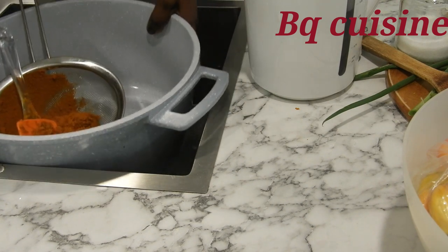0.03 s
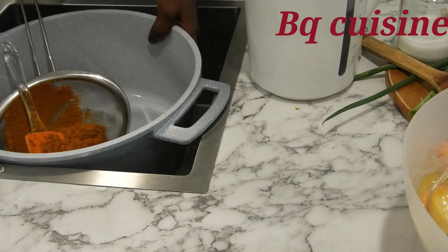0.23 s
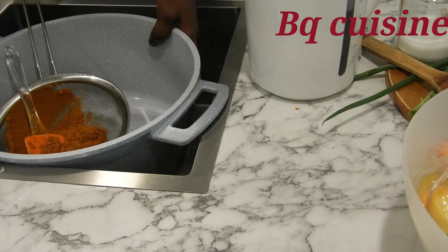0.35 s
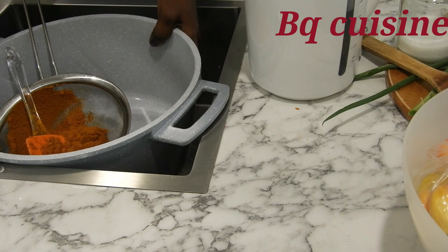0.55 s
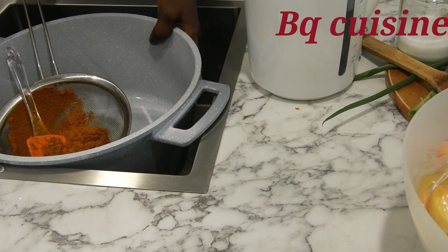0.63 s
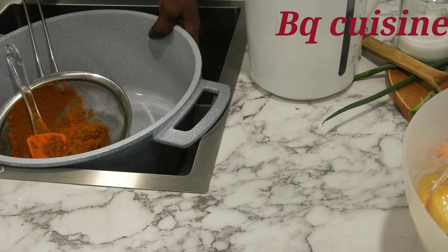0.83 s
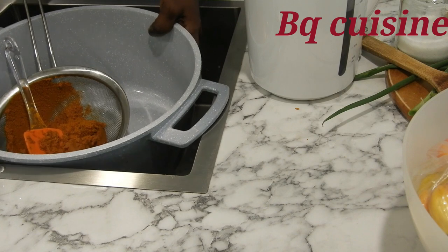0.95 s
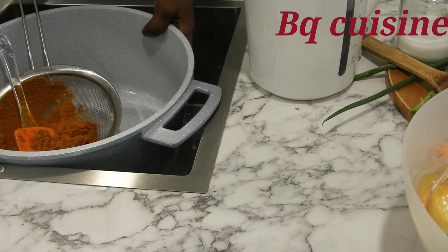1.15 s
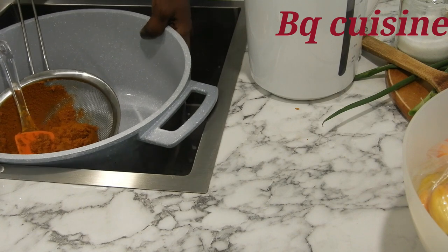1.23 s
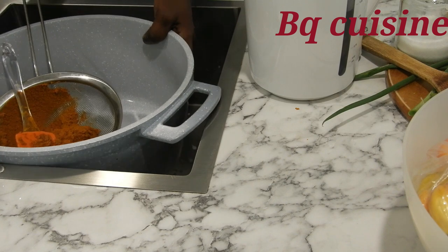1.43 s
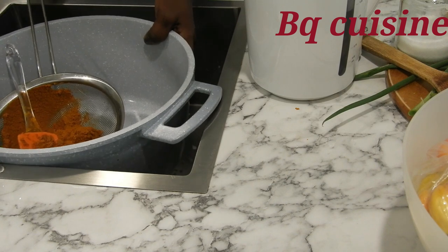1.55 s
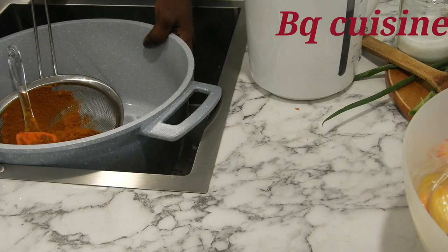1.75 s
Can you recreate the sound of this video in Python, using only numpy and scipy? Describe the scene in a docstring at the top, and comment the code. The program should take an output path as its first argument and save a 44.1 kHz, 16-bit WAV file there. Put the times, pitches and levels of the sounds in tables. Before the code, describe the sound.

A spatula knocks and drags thick paste through a metal sieve in a cast pot: two strong clattering knocks early, a quiet gap, then softer taps, groaning scrapes and wire clinks; close stereo, small hard-walled kitchen.

```python
"""Spatula and sieve in a cast pot

A spatula works thick paste through a metal sieve lying in a cast pot, close by in a small kitchen.
Knocks: decaying modes of hob, pot and sieve plus filtered noise cracks. Wire handle: bright clinks.
The spatula drags throughout: low noise judder, groans of unsteady pitch, grainy wet hiss.
Dull bumps are damped low sines; knocks, clinks and bumps excite a diffuse noise reverberation."""
import sys
import numpy as np
from scipy import signal
from scipy.fft import rfft, irfft
from scipy.io import wavfile

SR = 44100
rng = np.random.default_rng(int(sys.argv[2]) if len(sys.argv) > 2 else 0)


def int16_out(signal):
    """Quantize to a 16-bit WAV file."""
    q = np.round(np.clip(np.atleast_2d(signal).T, -1, 1) * 32767)
    wavfile.write(sys.argv[1], SR, q.astype(np.int16))


N = 79380
T = np.arange(N) / SR
FREQS_HZ = np.arange(N + 1) * SR / (2 * N)

# steady room noise spectrum: f/Hz, level per Hz/dB
FLOOR_SPECTRUM = [(25, -15), (65, -3.5), (130, -4.5), (250, -19), (500, -15.5), (1200, -20.5), (2000, -30),
                  (4000, -32), (8000, -33.5), (16000, -18)]
FLOOR_DB = -52.5

# force of the spatula's stroke: t/s, judder level/dB, mesh hiss level/dB
STROKE = [(0, -54.5, -59), (0.111, -66, -56), (0.166, -36.5, -67), (.27, -32.5, -45), (.45, -36, -71),
          (.62, -48, -63), (.78, -74.5, -61), (.94, -61.5, -58), (1.052, -61, -58.5), (1.16, -47, -54.5),
          (1.279, -40, -53.5), (1.35, -41.5, -52.5), (1.43, -43.5, -57), (1.5, -41, -53),
          (1.55, -51.5, -53.5), (1.654, -50, -50.5), (1.72, -50, -51.5), (1.8, -49.5, -53.5)]
# pot shaken by the stroke, spectrum: f/Hz, level per Hz/dB
JUDDER_SPECTRUM = [(30, -33), (70, -5.5), (110, -4.5), (160, -1.5), (215, 1.5), (340, -7.5), (500, -9),
                   (650, -18.5), (900, -17), (1170, -17), (1600, -26), (2300, -22), (5000, -34)]
JUDDER_ROUGH_DB, JUDDER_RATE_HZ = 1, 57
# paste through the mesh, spectrum: f/Hz, level per Hz/dB
MESH_SPECTRUM = [(500, -26), (1300, 6.5), (2500, -5.5), (4000, -2), (5500, 0.5), (9000, 10.5), (15000, -3)]
GRAINS_PER_S, GRAIN_T60_S, GRAIN_SPREAD_DB, GRAIN_SHARE = 450, 0.031, 2, 0.78

# pot and sieve knocks: t/s, thump level/dB, thud f/Hz, thud t60/s, thud level/dB, pot level/dB,
# clack level/dB, rim f/Hz, rim level/dB, edge level/dB, tick level/dB, crack t60/s,
# rattle level re crack/dB, sieve ring level/dB, wall ring level/dB, low clang f/Hz, low clang level/dB,
# high clang f/Hz, high clang level/dB, left over right before the scene's pan/dB
KNOCKS = [ (.1550, -24, 284.8, 0.098, -16.5, -22.5, -25.5, 1830, -33, -31.5, -20.5, 0.03, 25, -34.5, -29, 652, -27.5, 1036, -32, 0.5),
          (.3210, -44, 348, 0.012, -15, -17.5, -24.5, 1378, -24.5, -29, -25, 0.023, -28, -22.5, -33, 777, -30, 2800, -28, 1),
          (0.4758, -51, 345, 0.013, -34, -36, -32.5, 2070, -38.5, -43, -35.5, 0.11, -20, -46, -45, 650, -38.5, 1163, -38.5, 0),
          (0.489, -41, 348.5, 0.029, -30, -37, -48, 1910, -50.5, -39.5, -68, 0.039, -17, -50, -47, 631, -45, 1140, -39, 2),
          (.9650, -46.5, 341, 0.023, -33, -36.5, -55, 1540, -54, -63, -80, 0.087, 13, -51.5, -58.5, 1415, -53, 2323, -57, 2),
          (1.1920, -33.5, 340, 0.025, -30, -31, -31, 2080, -41.5, -40.5, -41, 0.098, -8, -39.5, -43, 660, -35.5, 910, -37.5, 0.7),
          (1.2150, -45, 229, 0.14, -30, -32, -63, 1960, -64, -47, -42, 0.19, 1, -48.5, -56, 900, -42, 1660, -48, 0),
          (1.3947, -44.5, 347, 0.035, -44.5, -43, -40.5, 1710, -48, -52, -46, 0.15, -8, -60, -50, 1217, -44, 2000, -51.5, 1),
          ]
# resonances of hob, pot, pot wall and sieve: f/Hz, level/dB, t60/s
HOB_MODES = [(44, -2.5, 0.26), (109.9, 14, 0.18), (157.6, 7, 0.18)]
POT_MODES = [(225.4, 3, 0.17), (269, -7.5, 0.35), (326.1, -7.5, 0.21), (355, -11, 0.2), (429, -11, 0.13),
             (545.5, -4.5, 0.11), (668, -22.5, 0.25)]
WALL_MODES = [(1667, 1, 0.11), (1873, -0.5, 0.14), (2005, 0, 0.16), (2150, -3.5, 0.13), (2367, -2, 0.17),
              (2450, -7, 0.167), (2794, -6, 0.21), (3054, -5.5, 0.24), (3452, 0.5, 0.11), (3898, -2.5, .14)]
SIEVE_MODES = [(842, -22.5, 0.26), (1095, -8, 0.16), (1162, -1.5, 0.29), (1202, 8.5, 0.18),
               (1266, -7, 0.11), (1423, 3, 0.1)]
# contact noise spectra, dull to bright: f/Hz, level per Hz/dB
CLACK_SPECTRUM = [(250, -12), (480, -9), (600, 6.5), (780, -6), (890, 5), (970, -2.5), (1170, 8),
                  (1400, -11), (1580, -12.5), (1900, -15.5), (3000, -59.5)]
EDGE_SPECTRUM = [(1800, -26), (2400, 2.5), (2790, -5.5), (3050, -2.5), (3550, -3.5), (4100, -3.5),
                 (5200, -24)]
TICK_SPECTRUM = [(3000, -7.5), (4300, 3.5), (5200, 0.5), (6500, 2.5), (7800, 1.5), (9000, 7.5),
                 (11000, -5.5), (16000, -12)]
CLACK_WIDTH, EDGE_WIDTH, TICK_WIDTH = 0.19, 0.58, 0.46  # side over mid
THUMP_RISE_S, POT_RISE_S, RING_RISE_S, THUD_RISE_S = 0.01, 0.0055, 0.0044, 0.0033
CONTACT_RISE_S, RATTLE_T60_S = 0.0012, 0.18
TICK_CRACK_T60_S, TICK_RATTLE_DB = 0.093, -17
CLANG_T60_S, CLANG_RISE_S = 0.047, 0.0008  # t60 up to 1 kHz
RING_WOBBLE, RING_WOBBLE_HZ = 0.0033, 69.4  # relative random pitch spread of all rings; its rate
SIEVE_LAG_S = 0.011  # the loose sieve lands just after the pot
RIM_STEP = 0.094  # relative frequency step between points of the rim peak

# wire handle on the rim: t/s, tap level/dB, tick level/dB, wire ring level/dB
CLINKS = [ (0.2078, -42, -31, -39), (1.4447, -35, -34, -40.5), (1.6660, -40.5, -45, -44.5), ]
# wire handle resonances: f/Hz, level/dB, t60/s
WIRE_MODES = [(663.4, 1.5, 0.18), (1110, 4, 0.12), (2600, -4.5, 0.2), (3096, -0.5, 0.14),
              (3445, -3.5, 0.14), (3750, 5, .09), (3810, 3, 0.044), (6500, 7.5, 0.082)]
# wire tap spectrum: f/Hz, level per Hz/dB
WIRE_SPECTRUM = [(250, -12), (620, 3), (800, 2), (1130, -6), (1400, -9), (2250, -19.5), (2600, 5),
                 (3000, -16), (3400, 1.5), (3750, -8), (4150, 2), (5200, -7)]
WIRE_CRACK_T60_S, WIRE_RATTLE_DB = 0.11, 6

# groans of stick and slip: t/s, length/s, f/Hz, level/dB
GROANS = [(.225, 0.1, 230, -36.5), (.615, .07, 351.1, -44), (.67, 0.062, 206, -52.5),
          (1.25, .075, 223.6, -43), (1.318, 0.086, 203.6, -35.5), (1.465, 0.07, 209, -39),
          (1.535, 0.24, 209.4, -52), (1.72, 0.096, 215.4, -45.5)]
GROAN_WOBBLE, GROAN_WOBBLE_HZ = 0.0076, 60  # relative random pitch spread; its rate

# dull bumps of the pot settling and the spatula pressing, plus a low 157 Hz thump of the knock at 0.321 s: t/s,
# f/Hz, t60/s, level/dB
BUMPS = [(0.228, 109, 0.11, -37), (0.331, 157, 0.068, -24.5), (0.894, 153, 0.11, -51.5),
         (1.178, 312, 0.045, -41.5), (1.347, 277, 0.042, -38), (1.424, 220, 0.034, -41)]

# kitchen reverberation: low f/Hz, high f/Hz, t60/s, level before band-pass/dB, side over mid
ROOM = [(61.5, 204, 0.84, -16, 0.069), (177, 456, 0.65, -9, 0.11), (441, 1263, 0.56, -7.5, 0.24),
        (1540, 2860, 0.79, -12, 0.44), (2220, 5200, 0.32, -6.5, 0.4), (3860, 14400, 0.56, -10, 0.72)]
ROOM_RISE_S, LEFT_DB = 0.0046, 1.5

# overall tone, much weaker above 10 kHz: f/Hz, level/dB
TONE = [(20, -3), (60, -0.5), (1000, -1.5), (4000, 1.5), (6000, 3), (9300, -3), (10200, -13),
        (11200, -15.5), (13500, -24.5), (16000, -36)]
SPLIT_HZ, CROSSOVER_HZ, TREBLE_LAG_S, TOP_HZ = 3930, 120, 0.00998, 16400


def undb(db):
    """Decibels to gain."""
    return 10 ** (np.asarray(db) / 20)


def unit(x):
    """Scale to rms 1."""
    return x / np.sqrt(np.mean(x ** 2))


def blow(x, size=1100):
    """Scale to rms 1 over the attack, the first 1100 samples."""
    return x / np.sqrt(np.mean(x[..., :size] ** 2))


def fade(t60_s):
    """Exponential decay by 60 dB in t60_s."""
    return np.exp(-np.log(1000) * T / t60_s)


def rise(seconds):
    """Smooth exponential onset."""
    return 1 - np.exp(-T / seconds)


def band(x, lo_hz, hi_hz):
    """Band-pass."""
    sos = signal.butter(3, [lo_hz, hi_hz], "band", fs=SR, output="sos")
    return signal.sosfilt(sos, x)


def colour(x, points):
    """Filter by a spectrum of (Hz, dB) points, joined on a log frequency axis."""
    hz, db = np.array(points, float).T
    n = x.shape[-1]
    freqs_hz = np.arange(n + 1) * SR / (2 * n)
    gain = undb(np.interp(np.log(freqs_hz + 1), np.log(hz), db))
    return irfft(rfft(x, 2 * n) * gain)[..., :n]


def stereo(mid, side, width):
    """Left and right from mid and side; width is side over mid."""
    return np.array([mid + width * side, mid - width * side])


def noise(width):
    """Stereo white noise of rms 1."""
    mid, side = rng.standard_normal((2, N))
    return unit(stereo(mid, side, width))


def wander(rate_hz):
    """Random wobble: normal draws at rate_hz joined by straight lines."""
    return np.interp(T * rate_hz, np.arange(1000), rng.standard_normal(1000))


def add(out, x, start_s):
    """Mix a sound in at a time."""
    i = int(start_s * SR)
    out[:, i:] += x[..., :N - i]


def pan(x, left_db):
    """Make the left channel left_db louder than the right."""
    return x * undb(np.array([[left_db], [-left_db]]) / 2)


def room_noise():
    """Steady coloured noise of the quiet room."""
    return undb(FLOOR_DB) * unit(colour(noise(0.34), FLOOR_SPECTRUM))


def judder():
    """The dragging spatula shakes the pot: low noise following the stroke, roughened at random."""
    times_s, judder_db, _ = np.array(STROKE).T
    level_db = np.interp(T, times_s, judder_db) + JUDDER_ROUGH_DB * wander(JUDDER_RATE_HZ)
    return unit(colour(noise(0.18), JUDDER_SPECTRUM)) * undb(level_db)


def mesh_hiss():
    """Paste crackles through the mesh: random pops, each a short noise burst, over smooth hiss."""
    times_s, _, hiss_db = np.array(STROKE).T
    is_pop = rng.random(N) < GRAINS_PER_S / SR
    pops = is_pop * undb(GRAIN_SPREAD_DB * np.minimum(rng.exponential(size=N), 4))
    burst = noise(0.87) * fade(GRAIN_T60_S)
    grains = unit(signal.fftconvolve(pops[None], burst, axes=1)[:, :N])
    mesh = GRAIN_SHARE * grains + (1 - GRAIN_SHARE) * noise(1.0)
    return unit(colour(mesh, MESH_SPECTRUM)) * undb(np.interp(T, times_s, hiss_db))


def ring(modes, rise_s, size=32768):
    """Decaying modes at random phases, sharing a slight random pitch wobble."""
    clock_s = np.cumsum(1 + RING_WOBBLE * wander(RING_WOBBLE_HZ)[:size]) / SR
    tones = np.zeros(size)
    for hz, db, t60_s in modes:
        phase = 2 * np.pi * hz * clock_s + rng.uniform(0, 2 * np.pi)
        tones += undb(db) * fade(t60_s)[:size] * np.sin(phase)
    return np.pad(blow(rise(rise_s)[:size] * tones), (0, N - size))


def thud(hz, t60_s):
    """Low, heavily damped swing of the pot."""
    return blow(np.sin(2 * np.pi * hz * T) * rise(THUD_RISE_S) ** 2 * fade(t60_s))


def clang(hz):
    """Short ring of the pot wall where it is struck; above 1 kHz, higher ones die sooner."""
    tone = np.sin(2 * np.pi * hz * T + rng.uniform(0, 2 * np.pi))
    return blow(tone * rise(CLANG_RISE_S) * fade(CLANG_T60_S * min(1, 1000 / hz)))


def resonance(hz):
    """Spectrum points of a broad peak."""
    shape = [(-3, -35), (-1, -5), (0, 0), (1, -5), (3, -35)]  # steps, dB
    return [(hz * (1 + RIM_STEP) ** k, db) for k, db in shape]


def contact(spectrum, crack_t60_s, rattle_db, width, size=16384):
    """Noise burst at a contact: a crack and a dense rattle, each with its own decay."""
    envelope = rise(CONTACT_RISE_S) * (fade(crack_t60_s) + undb(rattle_db) * fade(RATTLE_T60_S))
    mid, side = colour(rng.standard_normal((2, size)), spectrum)
    burst = stereo(mid, side, width) * envelope[:size]
    return np.pad(blow(burst), ((0, 0), (0, N - size)))


def tick():
    """Brightest part of a contact."""
    return contact(TICK_SPECTRUM, TICK_CRACK_T60_S, TICK_RATTLE_DB, TICK_WIDTH)


def knocks():
    """Knocks thump the hob, ring pot and sieve and crack; rim and clang pitch depend on the spot hit."""
    out = np.zeros((2, N))
    for (start_s, thump_db, thud_hz, thud_t60_s, thud_db, pot_db, clack_db, rim_hz, rim_db, edge_db,
         tick_db, crack_t60_s, rattle_db, sieve_db, wall_db, low_hz, low_db, high_hz, high_db,
         left_db) in KNOCKS:
        body = undb(thump_db) * ring(HOB_MODES, THUMP_RISE_S)
        body += undb(thud_db) * thud(thud_hz, thud_t60_s)
        body += undb(pot_db) * ring(POT_MODES, POT_RISE_S)
        wall = undb(wall_db) * ring(WALL_MODES, CLANG_RISE_S)
        wall += undb(low_db) * clang(low_hz) + undb(high_db) * clang(high_hz)
        crack = undb(clack_db) * contact(CLACK_SPECTRUM, crack_t60_s, rattle_db, CLACK_WIDTH)
        crack += undb(rim_db) * contact(resonance(rim_hz), crack_t60_s, rattle_db, CLACK_WIDTH)
        crack += undb(edge_db) * contact(EDGE_SPECTRUM, crack_t60_s, rattle_db, EDGE_WIDTH)
        crack += undb(tick_db) * tick()
        sieve = undb(sieve_db) * ring(SIEVE_MODES, RING_RISE_S)
        add(out, pan(body + wall + crack, left_db), start_s)
        add(out, pan(sieve, left_db), start_s + SIEVE_LAG_S)
    return out


def clinks():
    """Light bright taps of the wire handle on the rim: contact noise and ringing wire modes."""
    out = np.zeros((2, N))
    for start_s, tap_db, tick_db, ring_db in CLINKS:
        tap = undb(tap_db) * contact(WIRE_SPECTRUM, WIRE_CRACK_T60_S, WIRE_RATTLE_DB, EDGE_WIDTH)
        wire = undb(ring_db) * ring(WIRE_MODES, CONTACT_RISE_S)
        add(out, tap + undb(tick_db) * tick() + wire, start_s)
    return out


def groans():
    """Stick and slip of the spatula: swelling tones of unsteady pitch with a weak second harmonic."""
    out = np.zeros((2, N))
    for start_s, length_s, hz, db in GROANS:
        pitch_hz = hz * (1 + GROAN_WOBBLE * wander(GROAN_WOBBLE_HZ))
        phase = 2 * np.pi * np.cumsum(pitch_hz) / SR
        swell = np.sqrt(np.maximum(np.sin(np.pi * np.minimum(T / length_s, 1)), 0))
        tone = unit(np.sin(phase) + 0.1 * np.sin(2 * phase))
        add(out, undb(db) * swell * tone, start_s)
    return out


def bumps():
    """Dull thuds: soft contacts, and a further low thump belonging to a knock."""
    out = np.zeros((2, N))
    for start_s, hz, t60_s, db in BUMPS:
        add(out, undb(db) * thud(hz, t60_s), start_s)
    return out


def kitchen(x):
    """Add diffuse reflections from hard walls and worktop: decaying noise in bands."""
    response = np.zeros((2, N))
    for lo_hz, hi_hz, t60_s, db, width in ROOM:
        tail = rise(ROOM_RISE_S) ** 2 * fade(t60_s)
        reflections = band(noise(width) * tail, lo_hz, hi_hz)
        response += undb(db) * reflections / np.sqrt(np.sum(tail ** 2))
    return x + signal.fftconvolve(x.mean(axis=0)[None], response, axes=1)[:, :N]


def scene():
    """Reverberant impacts, dry scraping and room noise, all a little to the left."""
    scrape = judder() + mesh_hiss() + groans()
    impacts = kitchen(knocks() + clinks() + bumps())
    return pan(room_noise() + scrape + impacts, LEFT_DB)


def record(dry):
    """Colours the sound, delays the treble, clips at full scale and cuts the top."""
    treble = 0.5 + 0.5 * np.tanh((FREQS_HZ - SPLIT_HZ) / CROSSOVER_HZ)
    lag = 1 - treble + treble * np.exp(-2j * np.pi * FREQS_HZ * TREBLE_LAG_S)
    late = irfft(rfft(colour(dry, TONE), 2 * N) * lag)[:, :N]
    low_pass = signal.ellip(8, 0.2, 70, TOP_HZ, fs=SR, output="sos")
    return signal.sosfilt(low_pass, np.clip(late, -1, 1))


dry = scene()
out = record(dry)
int16_out(out)
```